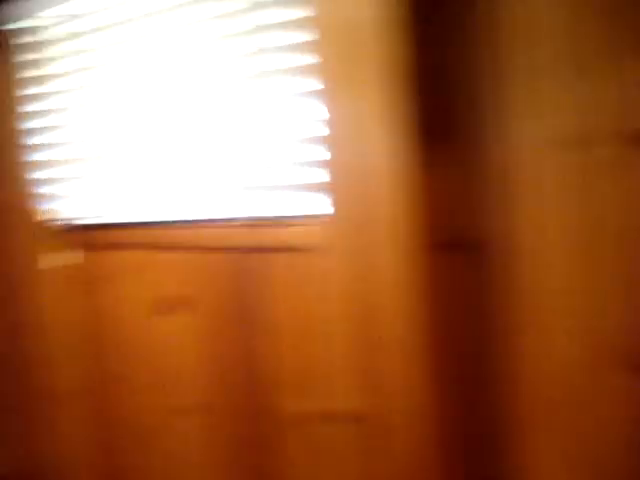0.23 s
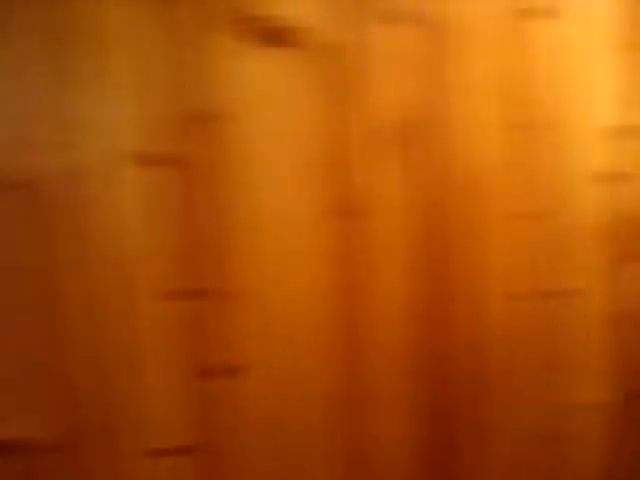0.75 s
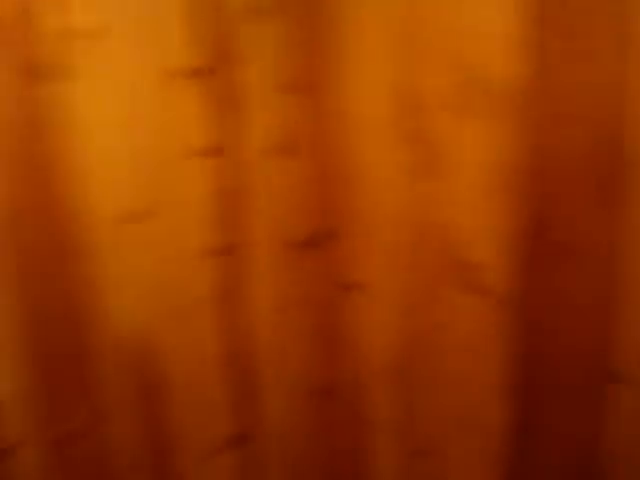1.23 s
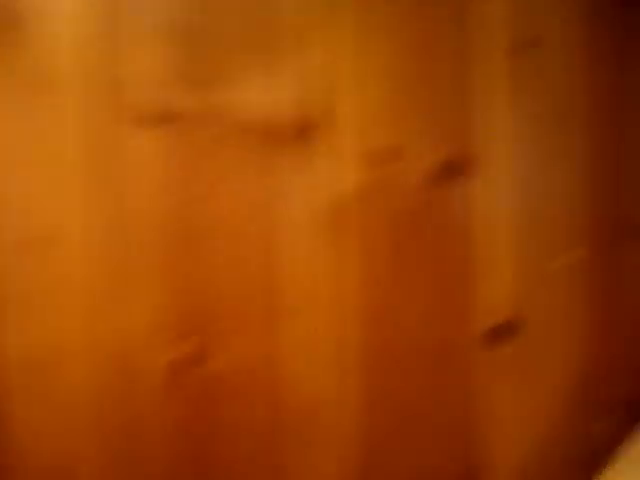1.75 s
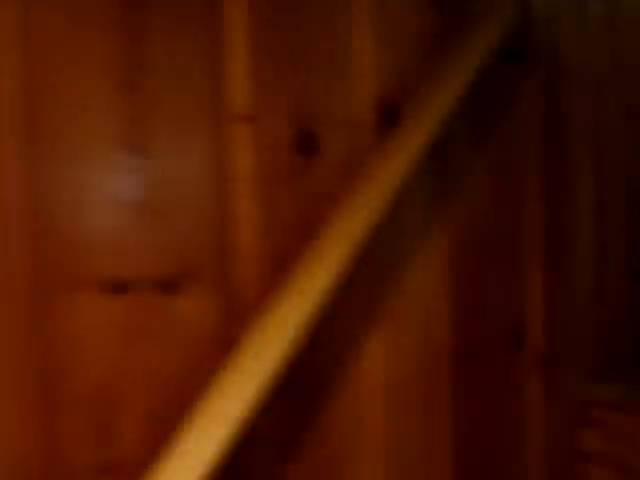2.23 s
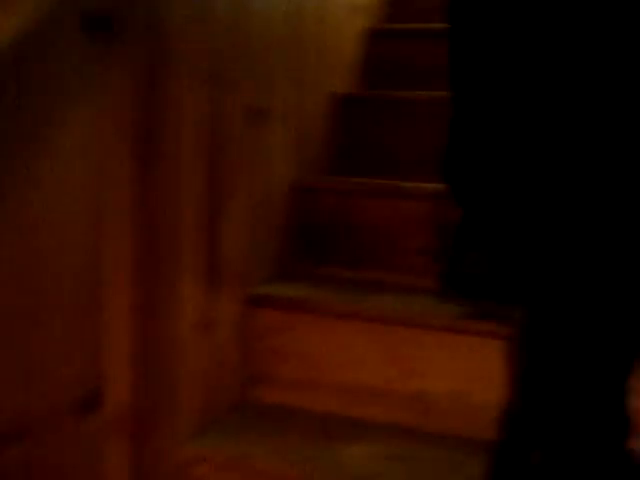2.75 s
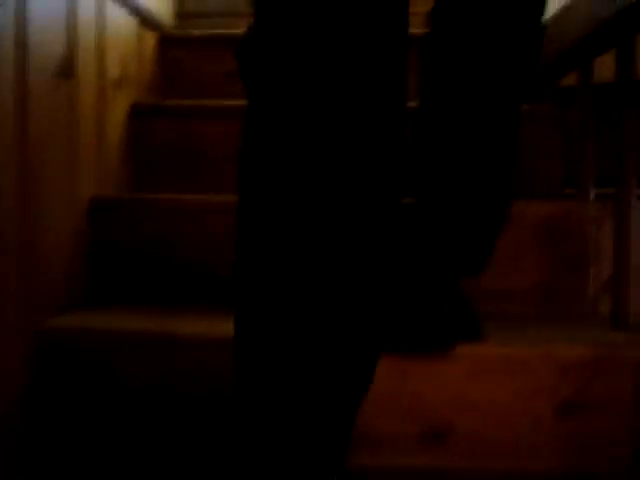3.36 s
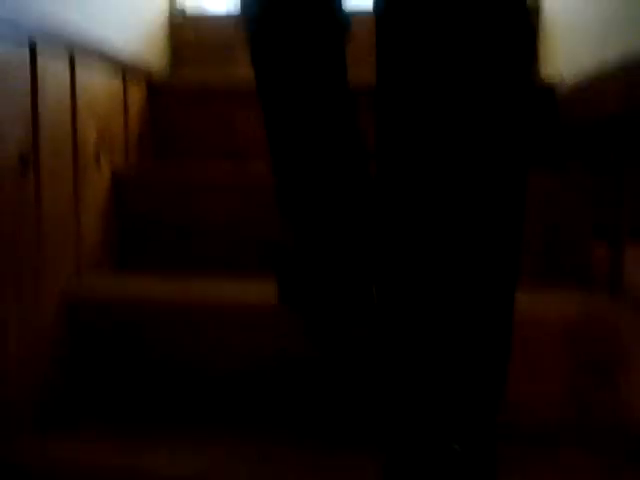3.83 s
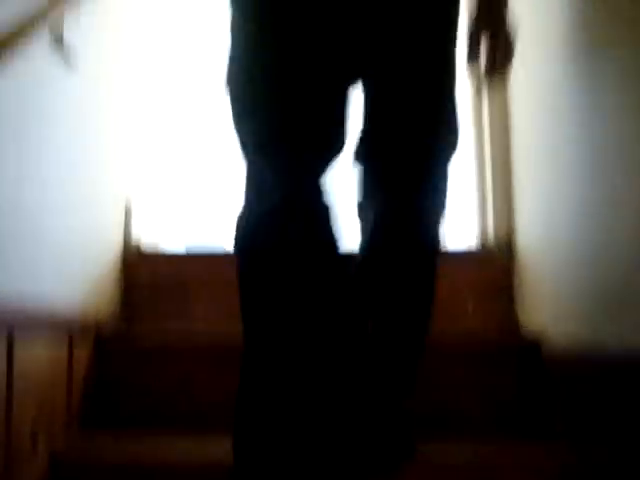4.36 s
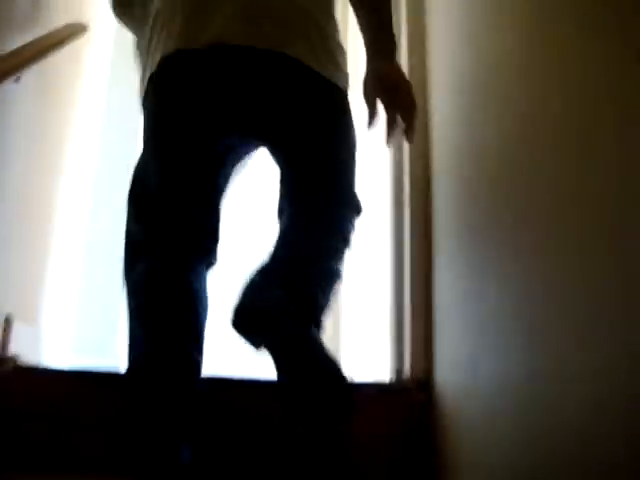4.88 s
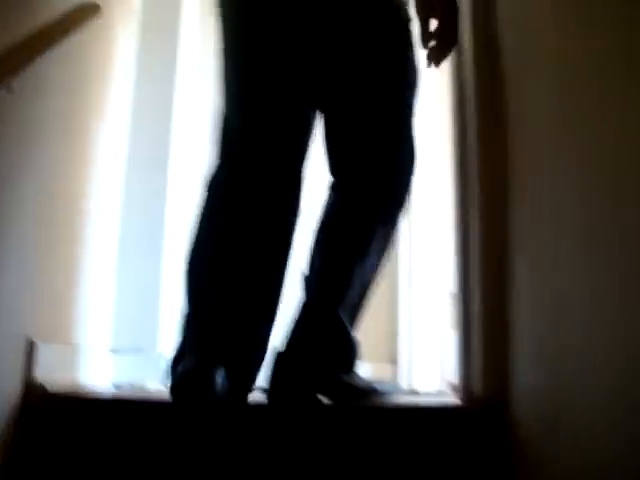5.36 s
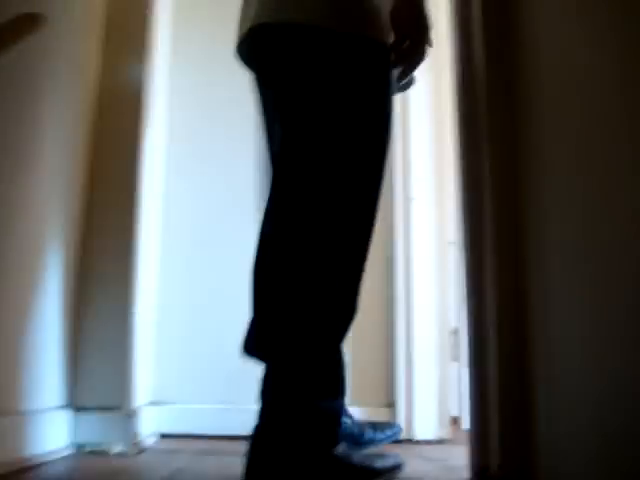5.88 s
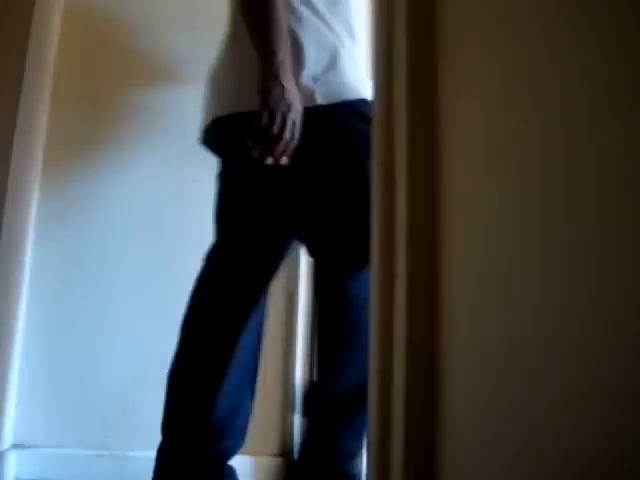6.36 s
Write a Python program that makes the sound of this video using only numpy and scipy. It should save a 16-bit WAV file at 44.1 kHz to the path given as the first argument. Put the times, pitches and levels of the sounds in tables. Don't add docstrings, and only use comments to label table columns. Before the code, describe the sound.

Someone in hard shoes climbs a wooden staircase in a bare, panelled house, close to a small microphone. Sharp heel knocks and hollow thuds come roughly twice a second, several doubled by lighter toe taps. Boards ring and answer late. Toward the end the soles scrape grittily and a few steps soften on the landing before a last hard one. Echoes hang over faint hiss; loud peaks sound squashed.

```python
import sys
import numpy as np
from scipy import signal
from scipy.fft import rfft, irfft, next_fast_len
from scipy.io import wavfile
from scipy.ndimage import uniform_filter1d

SR = 44100
rng = np.random.default_rng(int(sys.argv[2]) if len(sys.argv) > 2 else 0)


def voltage_ratio(decibels):
    exponent = np.asarray(decibels, float) / 20
    return 10 ** exponent


def unload_audio(sound):
    columns = np.transpose(np.atleast_2d(sound))
    steps = np.round(np.clip(columns, -1, 1) * 32767)
    wavfile.write(sys.argv[1], SR, steps.astype(np.int16))


N = 291426
RING = int(0.85 * SR)

# start in seconds, peak in dB, body weight in dB, flatness in dB, crack in dB.
FOOTFALLS = [(0.129, -8, -21.5, -1.3, -15.5), (0.745, -7.5, -21, -2.5, -14.5),
             (1.308, -8.5, -22.5, 2.5, -10.5), (1.817, -10, -15, 1, -9.5), (2.164, -10.5, -23.5, -1, -18),
             (2.527, -9.5, -28.5, -1.5, -14.5), (2.816, -12.5, -15, 1.5, -15),
             (2.952, -8, -26.5, -0.5, -11), (3.35, -14.5, -45, -3.5, -18.5), (3.432, -10.5, -20.5, -3, -9),
             (3.952, -7.5, -22.5, 6, -12), (4.412, -10, -28, -3, -8.5), (4.808, -9.5, -28.5, 1, -11.5),
             (5.252, -14.5, -38, -3, -8.5), (5.754, -25, -21, 6, -10), (6.004, -18, -11.5, 3, -14),
             (6.44, -10, -17, 1.5, -19)]
# start in seconds, peak in dB, flatness in dB, crack in dB.
LIGHT_TAPS = [(0.598, -36.5, 7, -18), (0.631, -32.5, 4, -15), (0.956, -20, -4.5, -29),
              (1.374, -19.5, 4, -12.5), (1.462, -21.5, 0.5, -10), (1.755, -23, 3.5, -16.5),
              (1.883, -18, 1.5, -20), (1.955, -29, 0.5, -15.5), (2.111, -20.5, 4, -16),
              (2.126, -26.5, -3.5, -8.5), (2.255, -24, 6, -14), (2.324, -25, 7, -8.5),
              (3.384, -25, -0.5, -27), (3.504, -20.5, 9.5, -21), (3.623, -22, -3, -12),
              (4.164, -19, 2, -17.5), (4.289, -31, -9, -9.5), (4.362, -35, 4, -16),
              (4.698, -32.5, -6, -4.5), (4.744, -20.5, -0.5, -6.5), (5.567, -33, -4, -10.5),
              (5.659, -33.5, -4, -7.5), (5.686, -36.5, -2, -9), (5.784, -23.5, 2, -18),
              (5.86, -26.5, 2.5, -22), (6.094, -22, -3.5, -12)]
# start in seconds, peak in dB, flatness in dB, crack in dB.
FIRST_TOUCHES = [
    (.938, -27, 4, -9.5),
    (2.911, -24, -2, -13),
    (4.15, -24.5, 0, -21),
    (.721, -41, -8, -3),
    (2.507, -19.5, 1, -17.5),
    (6.425, -38, -9, -15),
]
# frequency in Hz, level in dB per Hz.
BLOW_SPECTRUM = [(18, -74), (30, -36), (129, -20), (181, -13), (444, 0), (502, -2), (705, -2), (777, -5),
                 (1690, -7.5), (2000, -9), (3590, -18.5), (9940, -40.5), (12900, -79), (21900, -120)]
# start in seconds, rms level in dB, then the three modes in Hz.
TREADS = [(0.13, -25, 1015, 695, 197.3), (0.744, -29.5, 773, 1062, 460), (1.307, -23.5, 686, 360.4, 1080),
          (1.817, -25.5, 634, 784, 961), (2.164, -26, 456, 354, 888), (2.528, -30, 1086, 937, 344),
          (2.817, -27.5, 165, 233.4, 471), (2.95, -24.5, 659, 325.5, 386.5), (3.351, -32, 636, 1015, 822),
          (3.431, -28.5, 877, 441.5, 305), (3.53, -34, 633, 776, 543), (3.953, -24.5, 508, 703, 890),
          (4.412, -28, 508, 417.5, 890), (4.808, -33.5, 458, 821, 640), (5.253, -37, 664, 838, 1260),
          (5.755, -31, 334, 446, 219), (6.005, -31, 335.4, 671, 515), (6.44, -23, 534, 981, 922)]
# start in
# seconds, rms level in dB, mode in Hz.
LOOSE_BOARDS = [(0.7, -45, 300), (1.34, -29, 760), (1.817, -27, 610), (1.83, -29.5, 205.4),
                (2.817, -29, 195), (2.99, -31.5, 303.5), (3.431, -29, 1198), (3.505, -26.5, 312),
                (3.624, -33, 530), (3.625, -35.5, 790), (3.953, -29, 1085), (4.412, -45, 119),
                (4.808, -46, 119), (5.253, -45, 110.4), (5.254, -43, 211), (5.389, -35, 455),
                (5.58, -49.5, 327), (5.1, -46, 222), (5.87, -38.5, 325), (6.005, -40, 106.2),
                (6.006, -35, 230), (6.47, -32, 550)]
MODE_LEVELS = (0, -3.5, -7)
# start in seconds, peak in dB.
WEIGHT_SHIFTS = [
    (.58, -43),
    (3.49, -43),
    (4.76, -42),
    (5.33, -45.5),
    (5.76, -37),
]
# start in seconds, length in seconds, first level in dB, last level in dB.
SLIDES = [(0.632, 0.017, -46, -48), (1.906, .14, -39.5, -39), (4.16, .09, -48, -51),
          (4.751, .05, -37.5, -34), (4.876, 0.15, -36, -31), (5.17, .075, -30.5, -33),
          (5.274, .045, -26, -39.5), (5.351, 0.051, -37.5, -28.5), (6.038, 0.18, -36, -44.5),
          (6.498, 0.031, -43, -40), (6.54, .06, -33.5, -39.5)]
# frequency in Hz, level in dB per Hz.
SCRAPE_SPECTRUM = [(59, -65), (100, -19), (171, -33.5), (305, -8), (769, -3.5), (1510, -3.5), (2130, -9),
                   (2540, -10.5), (4180, -15), (9940, -25.5), (12900, -48), (21900, -120)]
# frequency in Hz, width in Hz, level in dB.
LEATHER_RINGS = [(754, 60, -8.5), (1660, 60, -13), (2270, 120, 0), (4160, 180, -5), (4640, 80, -7.5),
                 (6000, 320, -4), (7970, 300, -13)]
# frequency in Hz, time to fall 60 dB in seconds.
STAIRWELL_DECAY = [(60, 0.77), (150, 0.6), (300, 0.79), (700, 0.78), (1800, 0.65), (4800, 0.59),
                   (9000, 0.52)]
# frequency in Hz, level in dB per Hz.
HOUSE_SPECTRUM = [(18, -44), (30, -2), (54, -15.5), (490, 3), (1060, 2.5), (2050, -2), (3100, -4.5),
                  (3950, -7.5), (5040, -7), (9940, -15), (12900, -39), (21900, -120)]
# start in seconds, length in seconds, lowest lost frequency in Hz.
LOST_BANDS = [(0.096, 0.022, 1091.5), (0.106, 0.0079, 4), (1.282, .02, 2007), (1.284, 0.012, -2),
              (1.79, 0.023, 1784), (2.151, 0.0091, 1503), (2.479, 0.024, 4301.5), (2.511, .014, 3700),
              (2.798, .014, 2301), (2.941, 0.0092, 2500), (3.337, 0.0079, 1700), (6.434, .008, 2472),
              (3.408, 0.015, 2830), (4.378, 0.027, 1998), (5.134, 0.02, 4760), (5.337, 0.019, 5401)]


def footfalls(walls):
    rows = [(s, db, weight, -9.5 + flat, -3.4 - flat, crack) for s, db, weight, flat, crack in FOOTFALLS]
    for s, db, flat, crack in list(LIGHT_TAPS) + list(FIRST_TOUCHES):
        rows.append((s, db, -22 + 0.4 * flat, -8.5 + flat, -8.5 - flat, crack))
    out = np.zeros(N + 2 * RING)
    for (s, db, *shape_db), place in zip(rows, rng.random((len(rows), 1))):
        heard = signal.fftconvolve(blow(*shape_db), stairwell(walls, place[0]))
        start = int(s * SR)
        out[start:start + len(heard)] += voltage_ratio(db + 25) * heard
    return out[:N]


def blow(boom_db, thump_db, knock_db, crack_db):
    tilt = [(150, boom_db + 21.0), (450, thump_db + 3.5), (900, 0.0071),
            (1800, knock_db + 2.5), (4500, crack_db + 12.5)]
    flex = unit(rng.standard_normal(4096) * fade(0.026, 4096))
    click = signal.unit_impulse(4096) + voltage_ratio(-10.5) * flex
    return colour(unit(colour(click, BLOW_SPECTRUM)), tilt)


def boards():
    rows = []
    for s, db, *modes in list(TREADS) + list(LOOSE_BOARDS):
        rows += [(s, db + less, hz) for hz, less in zip(modes, MODE_LEVELS)]
    out = np.zeros(N + RING)
    t = np.arange(RING) / SR
    for (s, db, hz), (turn, apart, twin_turn) in zip(rows, rng.random((len(rows), 3))):
        twin_hz = hz + (8 + 14 * apart) * np.sign(twin_turn - 0.5)
        ring = np.sin(2 * np.pi * (hz * t + turn))
        ring += 0.52 * np.sin(2 * np.pi * (twin_hz * t + twin_turn))
        t60 = 0.5 if hz > 343 else 0.39
        build_up = 1 - fade(12 / hz, RING)
        start = int(s * SR)
        out[start:start + RING] += voltage_ratio(db + 5) * ring * fade(t60, RING) * build_up
    return out[:N]


def settles(walls):
    pushes = np.zeros(N)
    for s, db in WEIGHT_SHIFTS:
        pushes[int(s * SR)] = voltage_ratio(db + 25.5)
    thud = blow(boom_db=3, thump_db=-2, knock_db=-15, crack_db=-32)
    return signal.fftconvolve(pushes, signal.fftconvolve(thud, stairwell(walls, 0.3)))[:N]


def scuffs(walls):
    gain = pressure(np.arange(N) / SR)
    grit = rng.standard_normal(N) * voltage_ratio(2.2 * rng.exponential(size=N) + 1.34 * clumps(70, 1)[0])
    rings = np.zeros(N)
    for hz, width, db in LEATHER_RINGS:
        rings += voltage_ratio(db + 3) * signal.lfilter(*signal.iirpeak(hz, hz / width, fs=SR), grit)
    rub = unit(colour(grit + rings, SCRAPE_SPECTRUM)) * np.sqrt(N) * voltage_ratio(3) * gain
    return rub + voltage_ratio(-7.5) * signal.fftconvolve(rub, stairwell(walls, 0.5))[:N]


def pressure(t):
    attack_s, lift_db_per_s = 0.016, 280
    gain = np.zeros(len(t))
    for s, length, first_db, last_db in SLIDES:
        bite = np.clip((t - s) / attack_s + 1, 0, 1)
        drift_db = np.interp(t, [s, s + length], [first_db, last_db])
        lift_db = lift_db_per_s * np.clip(t - s - length, 0, 1)
        gain += bite * voltage_ratio(drift_db - lift_db)
    return gain


def stairwell(walls, place):
    bands, decays = walls
    start = int(place * (N - RING))
    tail = unit(np.sum(bands[:, start:start + RING] * decays, axis=0))
    response = tail * (1 - fade(0.013, RING)) * (1 + voltage_ratio(-2.5) * fade(0.1, RING))
    slap = np.sum(bands[5:, start:start + 2048], axis=0) * fade(0.017, 2048)
    response[:2048] += voltage_ratio(-9.5) * unit(slap)
    return response


def wall_bands(grain_db, clump_db):
    echoes = rng.standard_normal(N) * voltage_ratio(grain_db * rng.exponential(size=N))
    size = next_fast_len(N)
    centres = 40 * 2.0 ** np.arange(9)
    octave = np.log2((np.fft.rfftfreq(size, 1 / SR) + 1) / centres[:, None])
    band_gain = np.cos(np.pi / 2 * np.clip(octave, -1, 1)) ** 2
    bands = irfft(rfft(echoes, size) * band_gain, size)[:, :N]
    hz, seconds = np.transpose(STAIRWELL_DECAY)
    t60 = np.interp(np.log(centres), np.log(hz), seconds)
    decays = np.array([fade(t, RING) for t in t60])
    return bands * voltage_ratio(clump_db * clumps(45, len(centres))), decays


def house():
    return unit(colour(rng.standard_normal(N), HOUSE_SPECTRUM)) * np.sqrt(N) * voltage_ratio(-46)


def clumps(rate, rows):
    hold = int(SR / rate)
    levels = np.repeat(rng.standard_normal((rows, N // hold + 1)), hold, axis=1)
    return 1.22 * uniform_filter1d(levels, hold, axis=1)[:, :N]


def colour(x, points):
    hz, db = np.transpose(points)
    log_hz = np.log(np.fft.rfftfreq(4096, 1 / SR) + 1)
    cepstrum = irfft(np.interp(log_hz, np.log(hz), db) * np.log(10) / 20)
    cepstrum[1:2048] *= 2
    cepstrum[2049:] = 0
    return signal.fftconvolve(x, irfft(np.exp(rfft(cepstrum))))[:len(x)]


def unit(x):
    return x / np.sqrt(np.sum(x ** 2))


def fade(t60, count):
    return np.exp(-np.log(1000) * np.arange(count) / SR / max(t60, 0.002))


def scene():
    walls = wall_bands(grain_db=2.0, clump_db=1.56)
    return (footfalls(walls) + boards() + scuffs(walls) + house() + settles(walls))[None]


def lose_bands(x):
    holes_per_s, hole_s, hole_hz = 85, 0.007, 380
    hz, t, cells = signal.stft(x[0], SR, nperseg=256, noverlap=192)
    for s, length, low_hz in LOST_BANDS:
        cells[np.ix_(hz >= low_hz, np.abs(t - s - length / 2) < length / 2)] = 0
    for when, where, wide, long in rng.random((int(holes_per_s * N / SR), 4)):
        band = np.abs(hz - 5000 - 5000 * where) < hole_hz * (0.3 + wide ** 2)
        moment = np.abs(t - when * N / SR) < hole_s * (0.5 + long ** 3)
        cells[np.ix_(band, moment)] = 0
    return signal.istft(cells, SR, nperseg=256, noverlap=192)[1][None, :N]


def band_limit(x):
    return signal.sosfilt(signal.butter(12, 10090, fs=SR, output="sos"), x)


def record(dry):
    x = np.tanh(1.113 * dry) / 1.105
    x = signal.sosfilt(signal.butter(2, 55, "high", fs=SR, output="sos"), x)
    x = signal.sosfilt(signal.ellip(10, 0.2, 60, 10050, fs=SR, output="sos"), x)
    x = lose_bands(x)
    return band_limit(x)


dry = scene()
out = record(dry)
unload_audio(out)
```